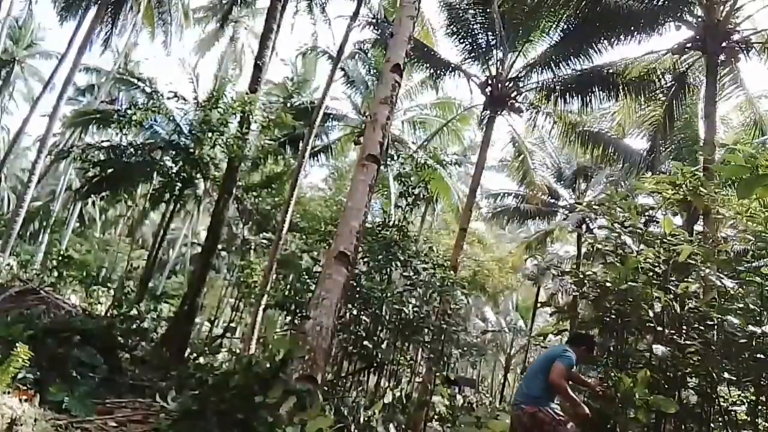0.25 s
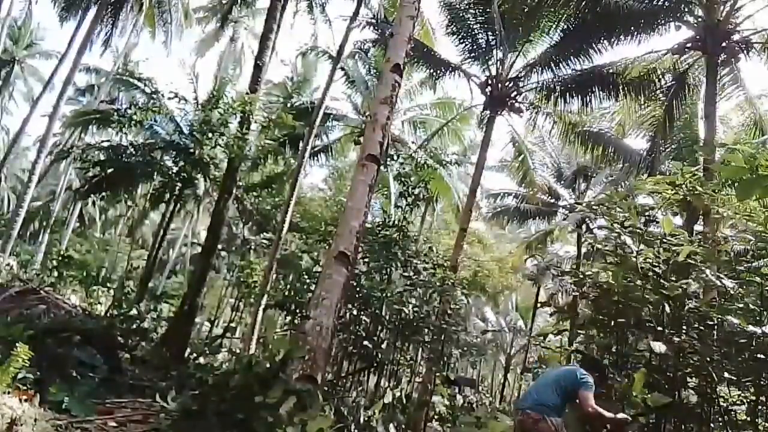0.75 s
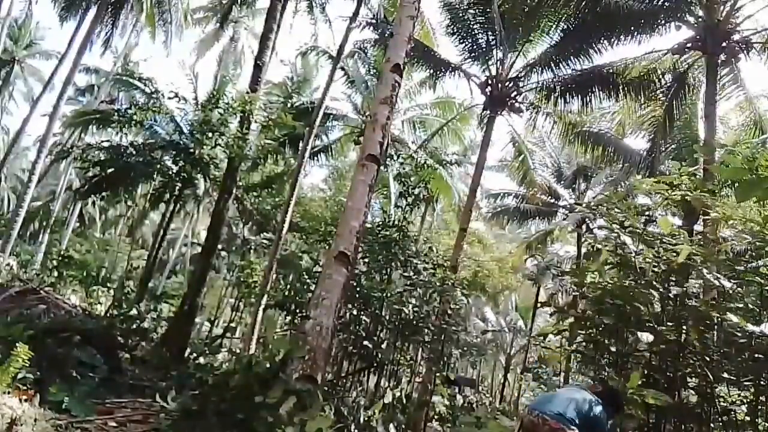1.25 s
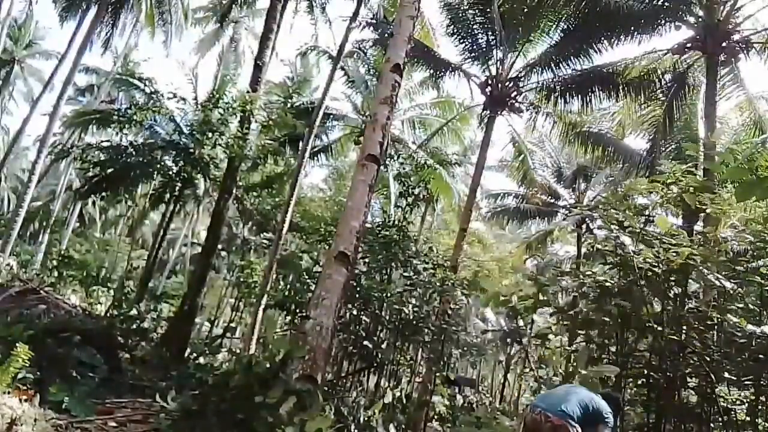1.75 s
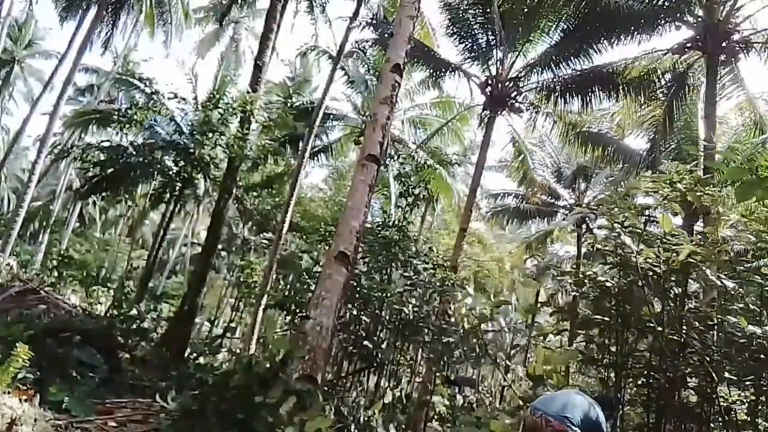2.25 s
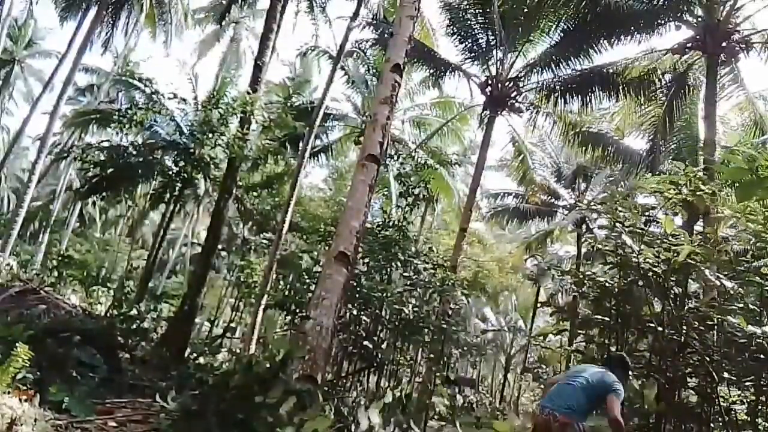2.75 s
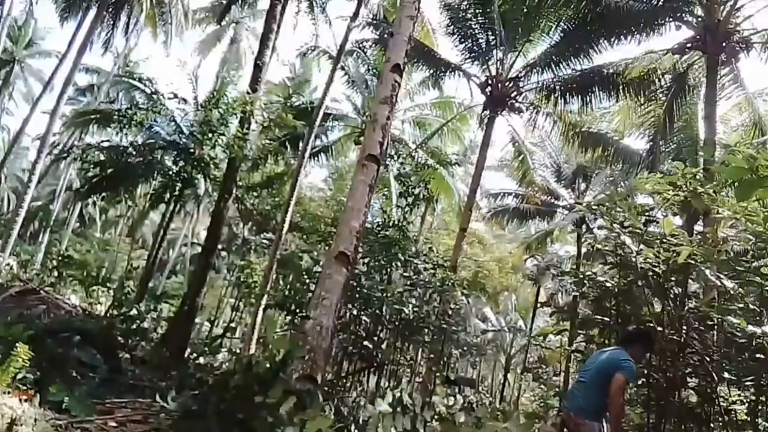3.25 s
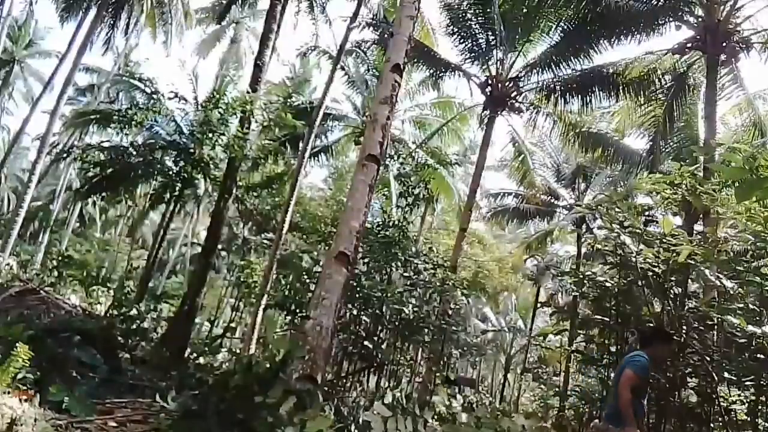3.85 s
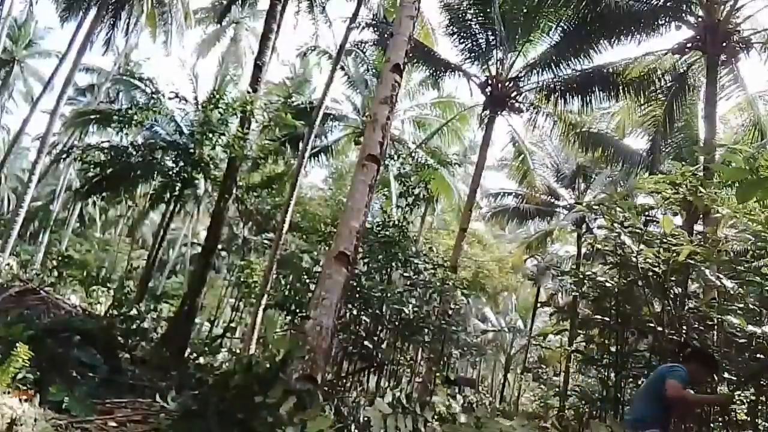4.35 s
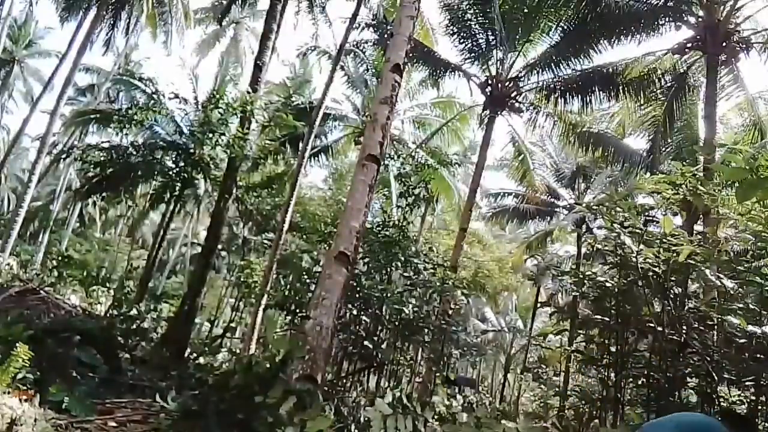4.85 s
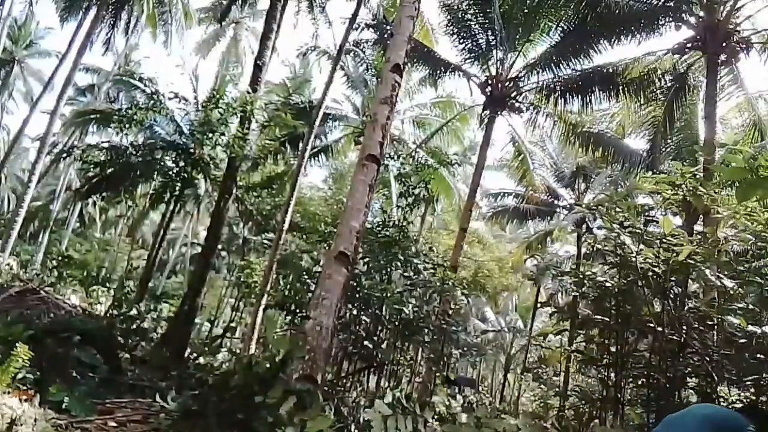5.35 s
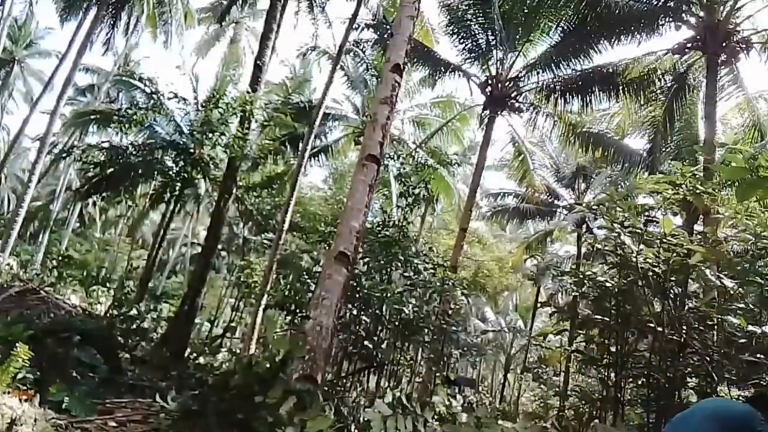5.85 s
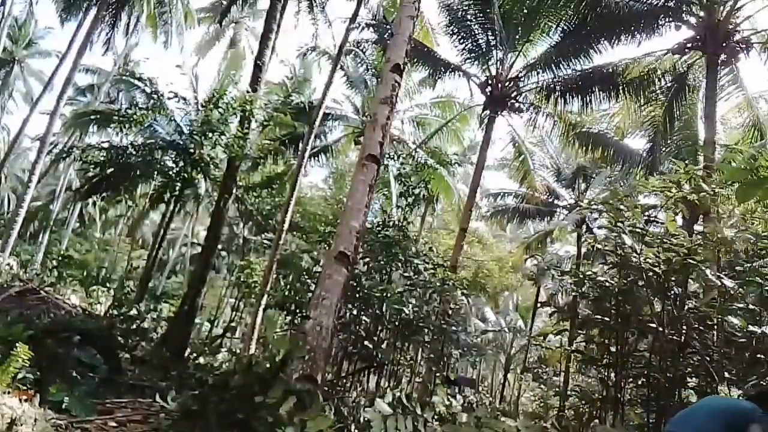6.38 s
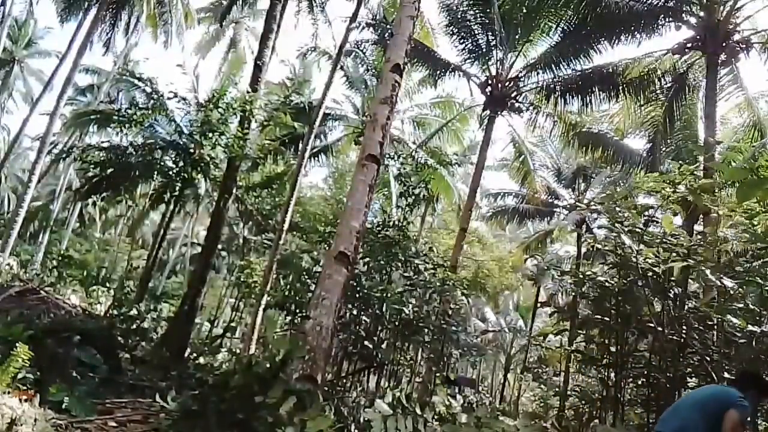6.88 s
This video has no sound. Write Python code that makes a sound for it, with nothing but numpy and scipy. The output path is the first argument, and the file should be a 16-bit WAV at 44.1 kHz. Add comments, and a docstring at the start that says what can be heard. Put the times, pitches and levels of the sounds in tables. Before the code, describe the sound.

In an open palm grove, a blade cuts brush some metres from the microphone. Soft rustling and little twig cracks lead to a sharp, splintering chop, then a heavier, thuddier one about a second later. Leaves shake and settle, stray snaps follow, then a third crisp whack rings out, fading into light crackle and a final swell of rustle over faint foliage hiss.

```python
"""A blade chops through brush in an open palm grove, some metres from the microphone.
Dragged leaves rustle and a few twigs crack; the first blow lands near 1.56 s, the next near 2.46 s.
Stray cracks and rustle lead to a third blow near 5.24 s; lighter cracks and a last swell of rustle follow.
Blows are noise bursts through ringing twigs plus damped swings; rustle is shaped ticks and hiss.
Far foliage and a faint insect band, both filtered noise, run throughout; echoes follow the blows."""
import sys
import numpy as np
from scipy import signal
from scipy.io import wavfile
from scipy.ndimage import uniform_filter1d

SR = 44100
rng = np.random.default_rng(int(sys.argv[2]) if len(sys.argv) > 2 else 0)


def to_wav(sig):
    """Store sig (one row per channel, or 1-D mono) as 16-bit WAV at the path in sys.argv[1].

    Samples outside -1..1 are clipped; the rate is SR.
    """
    pcm = np.clip(np.atleast_2d(sig), -1, 1) * 32767
    pcm = np.round(pcm).astype(np.int16)
    wavfile.write(sys.argv[1], SR, pcm.T)  # frames by channels


def natural_amplitude(level_db):
    """Convert a level in decibels to a linear amplitude factor, elementwise."""
    exponent = np.asarray(level_db, float) / 20
    return 10 ** exponent


N = 313815

# green wood spectrum: hz, relative_db (per Hz)
GREEN_WOOD = [(300, -2), (900, 2), (1400, -5), (1900, -0.5), (2600, -2), (3300, -6.5), (4200, -9.5),
              (6000, -7), (16000, -31)]
# dry leaf spectrum: hz, relative_db (per Hz)
DRY_LEAF = [(1000, -43), (3500, 10), (4900, 13), (5700, 13.5), (6600, 20), (7700, 21), (9000, 13),
            (11000, 1), (13000, -7.5), (16000, -11)]


def evened(x):
    """Scales to rms 1."""
    return x / np.sqrt(np.mean(x ** 2) + 1e-20)


def read(points, hz):
    """Reads a table on a log-frequency axis."""
    f, value = np.transpose(points)
    return np.interp(np.log(hz + 1), np.log(f + 1), value)


def add(mix, start_s, sound):
    """Mixes a sound in at start_s."""
    part = mix[round(start_s * SR):][:len(sound)]
    part += sound[:len(part)]


def ring(x, body):
    """Minimum-phase colouring by a spectrum table; white noise of rms 1 stays at rms 1."""
    hz = abs(np.fft.fftfreq(4096, 1 / SR))
    log_gain = np.log(natural_amplitude(read(body, hz)))
    response = np.exp(np.conj(signal.hilbert(log_gain)))
    taps = np.fft.ifft(response).real[:2048]
    return signal.oaconvolve(x, taps / np.linalg.norm(taps))[:len(x)]


def smooth_twice(x, size, axis=-1):
    """Two passes of a moving average."""
    return uniform_filter1d(uniform_filter1d(x, size=size, axis=axis), size=size, axis=axis)


def wander(points):
    """Slow random drift of rms 1: noise smoothed over so many samples."""
    return evened(smooth_twice(rng.standard_normal(N), points))


def twig_ring(hz, q, t):
    """Impulse response of a twig: a damped sine, unit energy."""
    twig = np.exp(-np.pi * hz / q * t) * np.sin(2 * np.pi * hz * t)
    return twig / np.linalg.norm(twig)


def air():
    """Far foliage: a smooth noise wash drifting in soft patches of time and frequency."""
    # far foliage spectrum: hz, relative_db (per Hz)
    foliage = [(15, -54), (25, -23), (122, -4.5), (199, -1.5), (350, -7.5), (458, -10), (510, -3),
               (583, -6.5), (667, -5.5), (1420, -9.5), (1580, -12.5), (4760, -16.5), (15600, -31)]
    level_db, patchy_rms_db = -59, 2.0
    frames, hz = N // 256 + 5, np.fft.rfftfreq(1024, 1 / SR)
    a, b, patches = rng.standard_normal((frames, 513, 3)).T
    patches = uniform_filter1d(patches, size=12, axis=0)  # across frequency
    patches = evened(uniform_filter1d(patches, size=14, axis=1))  # across time
    spectrum_db = read(foliage, hz)[:, None] + patchy_rms_db * patches
    wash = signal.istft((a + 1j * b) * natural_amplitude(spectrum_db), nperseg=1024, noverlap=768)[1][:N]
    return natural_amplitude(level_db) * evened(wash)


def insects():
    """A distant chorus blurred into one faint band: filtered noise, level wavering slightly."""
    # insect band: hz, relative_db (per Hz)
    chorus = [(4000, -37), (4600, -30), (4900, -22), (5200, -26), (5800, -47.5)]
    level_db, swell_rms_db = -70, 1.0
    gain = natural_amplitude(level_db - swell_rms_db * wander(points=2000))
    return gain * ring(rng.standard_normal(N), chorus)


def grove(x):
    """Scattered echoes from trunks and fronds, each band dying at its own speed."""
    # echo decay: hz, t60_s
    decay = [(150, 0.51), (400, 0.1), (1040, 0.48), (2760, 0.49), (7280, 0.92), (12000, 0.22)]
    delay_s = 0.0026
    taps = np.zeros(SR)
    at = np.arange(0, SR - 20, 20) + rng.integers(0, 20, (SR - 1) // 20)  # one echo per 20 samples
    taps[at] = rng.choice([-1., 1.], len(at))
    hz, t, z = signal.stft(taps, SR, nperseg=256)
    fading = z * natural_amplitude(-60 * t / read(decay, hz)[:, None])
    tail = signal.istft(fading, SR, nperseg=256)[1]
    tail = np.pad(tail / np.linalg.norm(tail), (round(delay_s * SR), 0))
    return signal.fftconvolve(x, tail)[:N]


def crackle(ticks_per_s, spread_db, hiss):
    """Ticks of random size and sign over a hiss (rms relative to the ticks), total rms 1."""
    size = natural_amplitude(spread_db * np.minimum(rng.exponential(1, N), 4)) * rng.choice([-1., 1.], N)
    ticks = evened(size * (rng.random(N) < ticks_per_s / SR))
    return evened(ticks + hiss * rng.standard_normal(N))


def twig_ticks(activity):
    """Twigs of several sizes tick at random, each a damped resonator at its own pitch."""
    low_hz, high_hz, count, q = 890, 3000, 8, 4.2
    t, out = np.arange(400) / SR, np.zeros(N)
    for hz in np.geomspace(low_hz, high_hz, count):
        ticks = crackle(ticks_per_s=22.0, spread_db=4.0, hiss=0)
        out += signal.oaconvolve(activity * ticks, twig_ring(hz, q, t))[:N] / np.sqrt(count)
    return out


def rustle():
    """Leaves and twigs tick and hiss in shared little gusts; the stems under them stir more dully."""
    # brush dragged or trodden: peak_s, twigs_db, swell_s (to 1/e), settle_s (to 1/e), leaves_over_twigs_db
    drags = [(0.0, -61.5, 0.1, 0.16, 2), (0.78, -62.5, 0.061, 0.24, -2), (1.66, -53, 0.02, 0.04, 0.5),
             (1.82, -54.5, 0.063, 0.19, -1.5), (2.444, -43.5, 0.0016, 0.011, 0),
             (2.99, -49.5, 0.16, 0.21, -4), (3.34, -61, 0.045, 0.091, 0), (3.7, -59.5, 0.58, 0.56, -4.5),
             (5.05, -77, 0.14, 0.18, 5), (6.05, -58.5, 0.038, 0.023, 5), (6.17, -61, 0.14, 0.18, 0.5),
             (6.265, -66.5, 0.012, 0.013, 8.5), (6.92, -63.5, 0.45, 0.17, 4)]
    # bush shaken by a blow, settling: start_s, leaves_db, twigs_db, t60_s
    shakes = [(1.579, -52, -41, 0.49), (2.461, -41.5, -37.5, 0.69), (5.239, -45, -44, 0.63)]
    # swaying stems spectrum: hz, relative_db (per Hz)
    stem_body = [(40, -36.5), (130, -4), (330, 1), (700, -4.5), (1300, -7), (2500, -23), (16000, -60)]
    leaves_rest_db, twigs_rest_db, stems_rest_db = -74.5, -68, -60  # left alone in the breeze
    stems_over_twigs_db, ticks_db, gusty_rms_db = 0.2, -5.5, 1.0
    t = np.arange(N) / SR
    leaves, twigs, stems = (natural_amplitude(db) * np.ones(N) for db in (leaves_rest_db, twigs_rest_db, stems_rest_db))
    for peak_s, twigs_db, swell_s, settle_s, leafy_db in drags:
        drag = natural_amplitude(twigs_db) * np.exp(-abs(t - peak_s) / np.where(t < peak_s, swell_s, settle_s))
        leaves = np.hypot(leaves, natural_amplitude(leafy_db) * drag)
        twigs = np.hypot(twigs, drag)
        stems = np.hypot(stems, natural_amplitude(stems_over_twigs_db) * drag)
    for start_s, leaves_db, twigs_db, t60_s in shakes:
        settle = (t > start_s) * natural_amplitude(-60 * np.maximum(t - start_s, 0) / t60_s)
        leaves = np.hypot(leaves, natural_amplitude(leaves_db) * settle)
        twigs = np.hypot(twigs, natural_amplitude(twigs_db) * settle)
    leaf_sound = ring(leaves * crackle(ticks_per_s=700.0, spread_db=1.5, hiss=1.14), DRY_LEAF)
    twig_sound = ring(twigs * crackle(ticks_per_s=900.0, spread_db=2.5, hiss=1.0), GREEN_WOOD)
    twig_sound += natural_amplitude(ticks_db) * twig_ticks(twigs)
    stem_sound = ring(stems * rng.standard_normal(N), stem_body)
    gusts = natural_amplitude(gusty_rms_db * wander(points=300))
    return gusts * (leaf_sound + twig_sound + stem_sound)


def thuds():
    """A clean swing that builds up to its peak as the blade bites and dies within a few cycles."""
    # stems, hard wood and ground taking the blow: peak_s, peak_db, pitch_hz, decay_cycles (to 1/e)
    blows = [(1.4124, -26.5, 523, 0.55), (1.433, -40, 563, 1.1), (1.5564, -33, 394, 0.83),
             (1.5578, -16.5, 2850, 1.5), (1.5667, -31, 256, 0.7), (1.5835, -19, 640, 0.48),
             (1.59, -42, 116, 0.96), (1.5977, -30, 350, 0.7), (2.4624, -20, 330, 0.51),
             (2.4668, -19, 705, 1), (2.471, -25, 620, 0.33), (2.474, -7.5, 348, 0.85),
             (2.477, -27, 140, 1.17), (2.541, -38, 1160, 3.5), (2.7746, -36.5, 477, 1.3),
             (2.9523, -37.5, 278, 1.35), (2.9715, -35.5, 565, 1), (3.0586, -31, 580, 0.98),
             (3.0831, -34, 550, 1.1), (3.676, -42, 2420, 7.5), (4.0175, -39.5, 360, 0.76),
             (4.862, -40.5, 400, 0.93), (5.1692, -39, 640, 1.6), (5.2339, -28.5, 415, 0.99),
             (5.2403, -16, 2960, 2.2), (5.2413, -19.5, 1370, 1.7), (5.2427, -21.5, 298, 0.45),
             (6.4066, -44, 515, 0.64)]
    rise_ratio = 0.74  # rise over decay time
    out, t = np.zeros(N), np.arange(-600, 2400) / SR
    for peak_s, peak_db, hz, cycles in blows:
        rise = np.exp(-(t * hz / (rise_ratio * cycles)) ** 2)
        decay = np.exp(-t * hz / cycles)
        shape = np.where(t < 0, rise, decay)
        add(out, peak_s + t[0], natural_amplitude(peak_db) * shape * np.cos(2 * np.pi * hz * t))
    return out


def cracks():
    """Each break is a fast burst of splinters that thins out; the twig rings briefly at its own pitch."""
    # fibres and twigs that break: start_s, woody_knock_db, knock_pitch_hz, dry_snap_db
    breaks = [(0.0354, -42.5, 2620, -38.5), (0.209, -55, 2600, -47.5), (0.4148, -48, 2870, -45.5),
              (0.61, -45, 1240, -45.5), (0.628, -49, 3000, -54), (0.756, -44.5, 3130, -41.5),
              (0.802, -41.5, 3180, -41), (0.836, -44, 2290, -52), (1.4106, -34, 2880, -33.5),
              (1.527, -48, 2500, -49), (1.5551, -21, 3230, -21), (1.5749, -20, 3200, -16.5),
              (1.5894, -43, 2800, -32), (1.797, -35.5, 1310, -39.5), (1.824, -40, 1820, -44),
              (1.8623, -38.5, 2750, -33.5), (1.878, -35, 1450, -39.5), (2.4072, -40.5, 2850, -49),
              (2.459, -20.5, 2750, -16.5), (2.4668, -21, 2960, -29), (2.47, -16.5, 1360, -19),
              (2.479, -25, 2340, -22.5), (2.704, -42, 2120, -38), (2.7706, -39.5, 2460, -60),
              (2.813, -39, 2510, -47), (2.8651, -33.5, 2540, -41), (2.891, -43, 1970, -50),
              (2.939, -36.5, 2560, -39.5), (3.051, -29, 2730, -50), (3.0554, -31, 2050, -30),
              (3.137, -49, 2400, -41), (3.4691, -39, 1390, -61), (3.7495, -38, 1350, -59),
              (5.1405, -44, 2900, -47.5), (5.1664, -50, 2880, -49), (5.2252, -42, 3310, -40),
              (5.2313, -30, 2440, -28), (5.2368, -13.5, 3230, -18), (5.2467, -38, 1320, -24.5),
              (5.895, -43.5, 1550, -46.5), (5.953, -45, 1310, -66), (6.165, -40.5, 2050, -53),
              (6.192, -43.5, 1710, -61), (6.294, -41, 1540, -60), (6.343, -58, 1500, -52)]
    rise_s, break_t60_s, q, broad_db = 0.0011, 0.019, 6.2, -2.0
    tear_db, tear_t60_s = -11, 0.092  # torn fibres keep parting softly
    knock, snap, t = np.zeros(N), np.zeros(N), np.arange(3000) / SR
    splinters = rng.standard_normal((len(breaks), 2, len(t)))
    decay = np.hypot(natural_amplitude(-60 * t / break_t60_s), natural_amplitude(tear_db - 60 * t / tear_t60_s))
    shape = (1 - np.exp(-t / rise_s)) * decay
    for (start_s, knock_db, hz, snap_db), (a, b) in zip(breaks, splinters):
        pitched = np.convolve(shape * a, twig_ring(hz, q, t[:300]))[:len(t)]
        wood = pitched + natural_amplitude(broad_db) * ring(shape * a, GREEN_WOOD)
        add(knock, start_s, natural_amplitude(knock_db) * evened(wood) * np.std(shape))
        add(snap, start_s, natural_amplitude(snap_db) * evened(shape * b) * np.std(shape))
    return knock + ring(snap, DRY_LEAF)


def scene():
    """Blows with their echoes over rustle, insects and air."""
    breaks, blows = cracks(), thuds()
    # fronds swallow the top of a thud before it returns
    dull_blows = signal.lfilter(*signal.butter(1, 1300, fs=SR), blows)
    echoes = grove(natural_amplitude(-17.0) * breaks + natural_amplitude(-10.5) * dull_blows)
    # thin stems send out little deep bass
    bass_cut = signal.butter(4, 100, "high", fs=SR, output="sos")
    near = signal.sosfilt(bass_cut, breaks + blows + echoes + rustle())
    return (near + air() + insects())[None]


def low_pass(x):
    """Removes everything above the highest recorded frequency."""
    return signal.sosfilt(signal.butter(12, 15710, fs=SR, output="sos"), x)


def record(dry):
    """Returns the finished sound."""
    return low_pass(dry)


dry = scene()
out = record(dry)
to_wav(out)
```